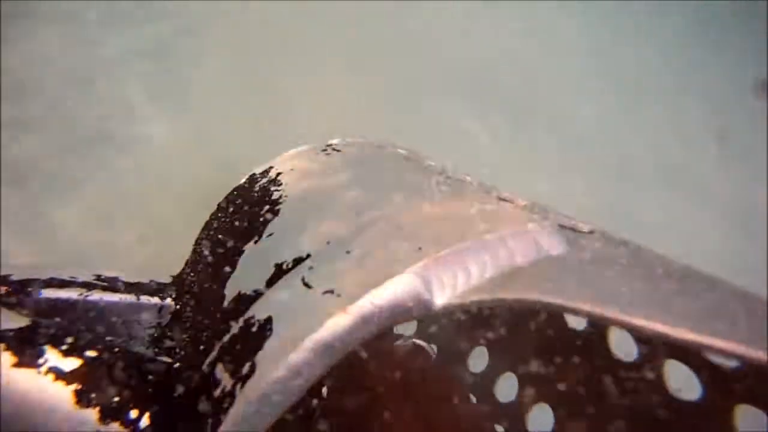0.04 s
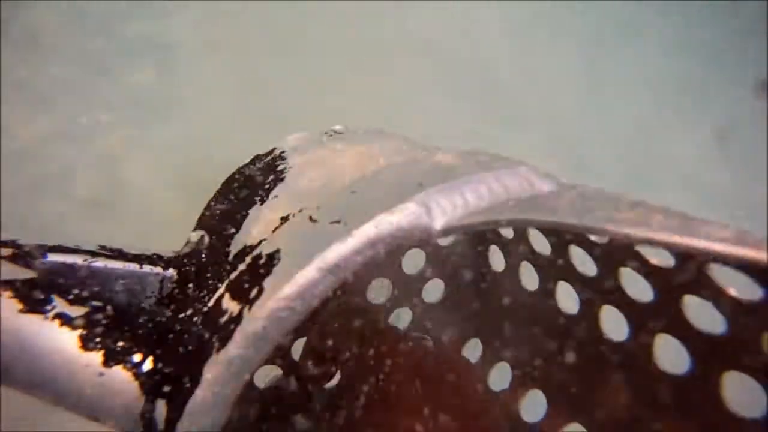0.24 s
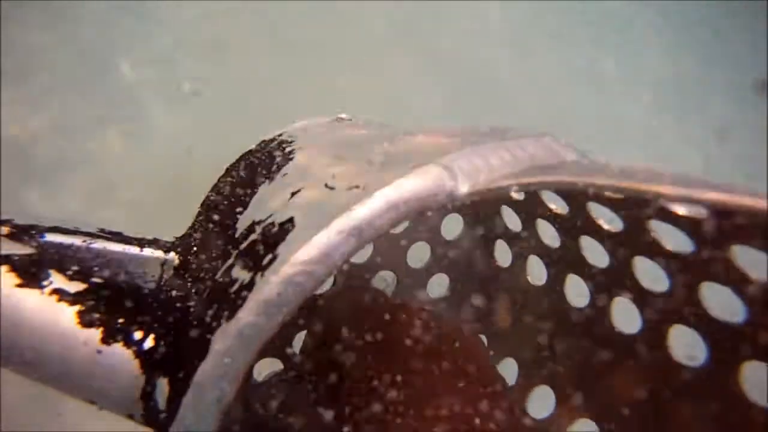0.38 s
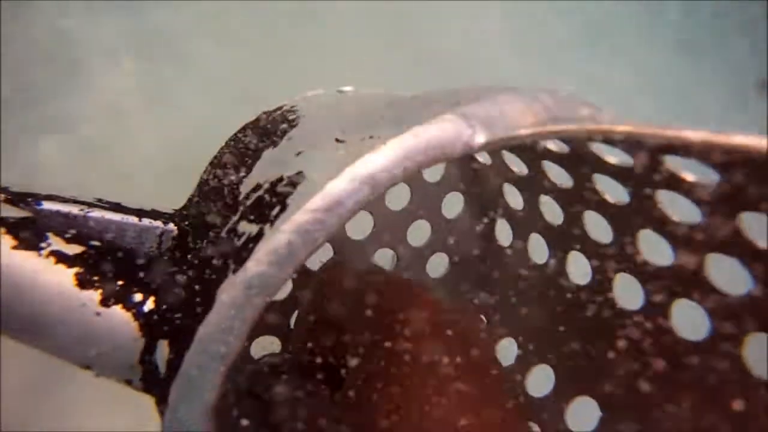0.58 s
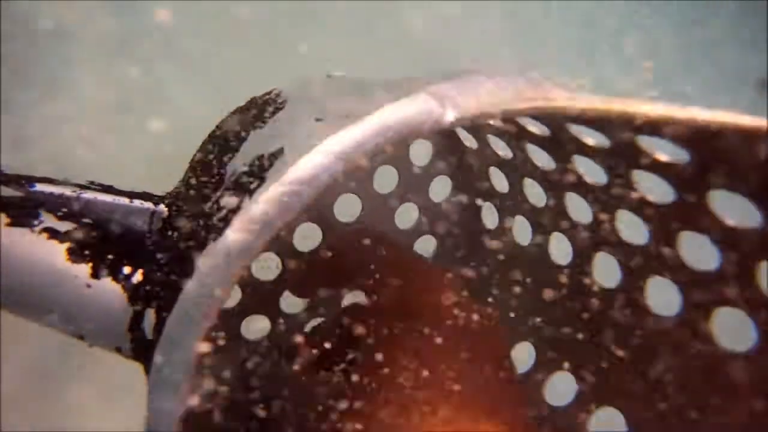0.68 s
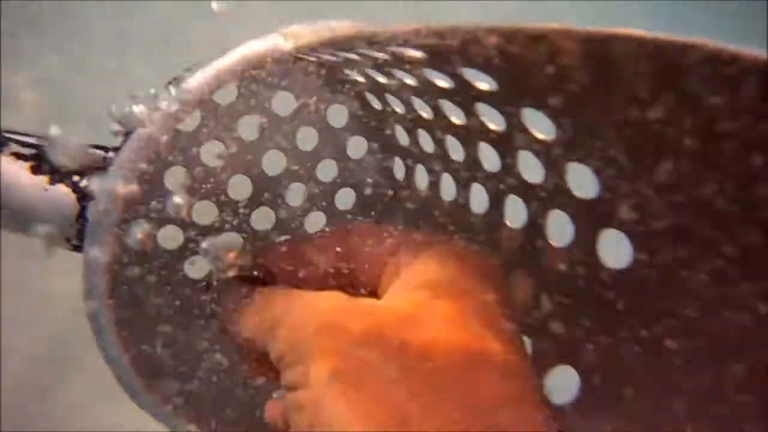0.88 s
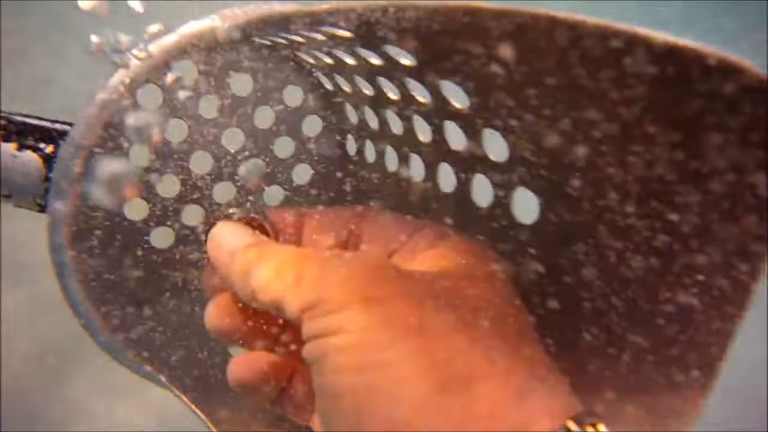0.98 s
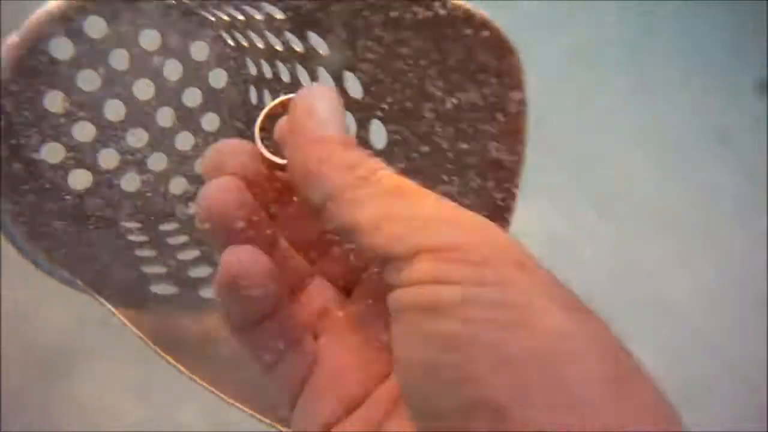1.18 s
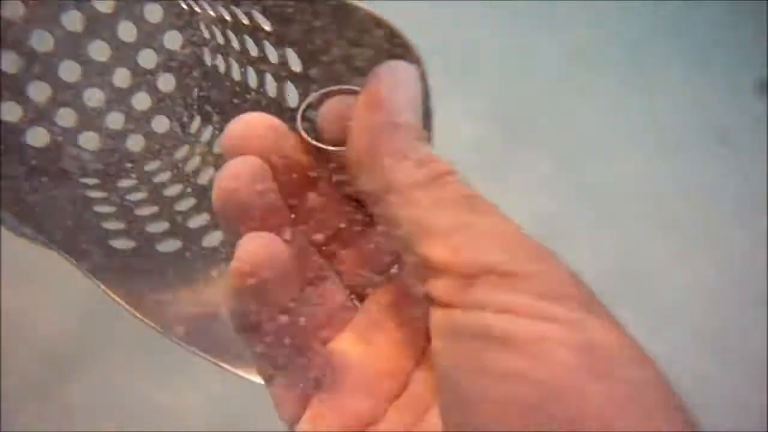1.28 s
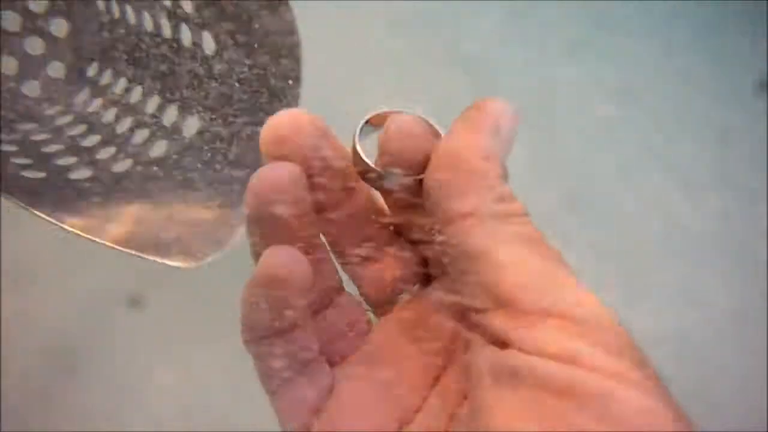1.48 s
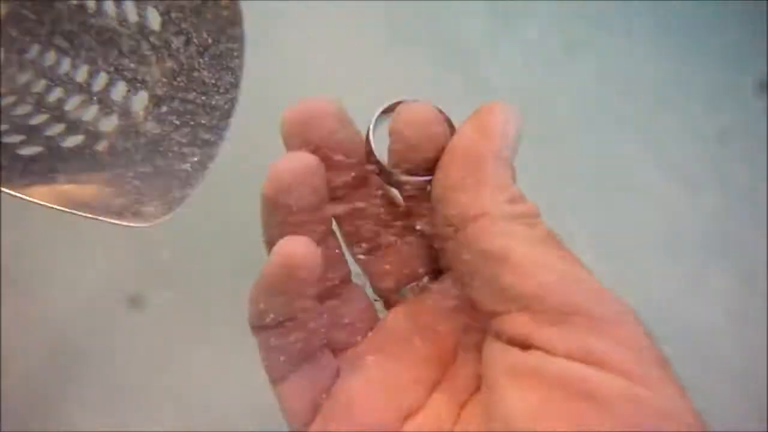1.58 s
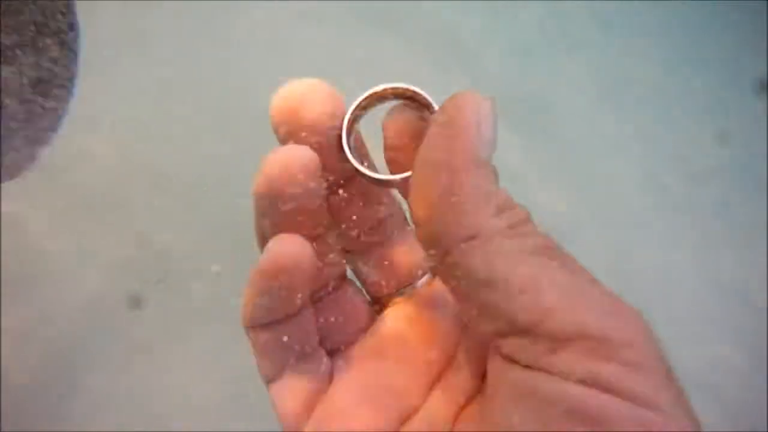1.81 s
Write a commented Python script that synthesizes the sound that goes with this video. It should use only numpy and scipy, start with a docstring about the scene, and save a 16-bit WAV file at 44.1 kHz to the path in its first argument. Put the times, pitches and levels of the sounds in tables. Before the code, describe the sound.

A metal scoop knocks, squeaks and scrapes as it is handled underwater.

```python
"""A perforated metal sand scoop is handled under water, close up, over a soft, steady rumble.
It knocks once hard, ringing its modes, then gives short stick-slip squeaks as it is rubbed.
A hand gropes inside, drags grit over the metal and slips off with a low ring; a few small bubbles trail off.
Throughout, the recorder samples slowly and holds each value, which mirrors the ring into the treble."""
import sys
import numpy as np
from scipy import signal
from scipy.fft import rfft, irfft
from scipy.io import wavfile

SR = 44100
rng = np.random.default_rng(int(sys.argv[2]) if len(sys.argv) > 2 else 0)


def to_wav(sig):
    """Store sig (one row per channel, or 1-D mono) as 16-bit WAV at the path in sys.argv[1].

    Samples outside -1..1 are clipped; the rate is SR.
    """
    pcm = np.clip(np.atleast_2d(sig), -1, 1) * 32767
    pcm = np.round(pcm).astype(np.int16)
    wavfile.write(sys.argv[1], SR, pcm.T)  # frames by channels


N = 81585
TIME = np.arange(N) / SR
FREQS = np.fft.rfftfreq(2 * N, 1 / SR) + 1e-3

# the scoop's modes: (frequency [Hz], relative level struck [dB], relative level rubbed [dB], t60 [s])
SCOOP_MODES = [(620.8, -28, -9, 0.28), (680, -40, -7, 0.025), (846.5, -24.5, -23, 0.1),
               (1095, -51, -14.5, 0.045), (1331, -23.5, -10.5, 0.17), (1429, -13.5, -14, 0.046),
               (1722.5, -20, -16.5, 0.068), (1738, -31, -13, .045), (2061, -5, -10, 0.082),
               (2263, -6, -3, 0.069), (2401, -8.5, -4, 0.046), (2643, -14, -17.5, 0.056),
               (2910, -12, -15.5, 0.041), (3057, -21, -9.5, 0.027), (3547, -16, -20.5, 0.051),
               (3717, -27, -20, 0.13), (4300, -28, -27, 0.064)]


def from_db(db):
    """Decibels to gain."""
    return 10 ** (np.asarray(db) / 20)


def rms(x):
    """Average signal level."""
    return np.sqrt(np.mean(x ** 2) + 1e-20)


def envelopes(rows):
    """One gain envelope for each dB column of a breakpoint table."""
    times, *columns = np.transpose(rows)
    return [from_db(np.interp(TIME, times, db)) for db in columns]


def filtered(x, response):
    """EQ with one gain per frequency."""
    return irfft(rfft(x, 2 * N) * response)[:N]


def coloured(x, curve):
    """Shape a sound with an EQ curve and normalise it to rms 1."""
    hz, db = np.transpose(curve)
    shaped = filtered(x, from_db(np.interp(np.log(FREQS), np.log(hz), db)))
    return shaped / rms(shaped)


def band(x, edges_hz):
    """Band-pass filter."""
    return signal.sosfilt(signal.butter(3, edges_hz, "band", fs=SR, output="sos"), x)


def puff(at_s, width_s, db, edges_hz):
    """A bell-shaped swell of band-passed noise."""
    noise = band(rng.standard_normal(N), edges_hz)
    return from_db(db) * np.exp(-.5 * ((TIME - at_s) / width_s) ** 2) * noise / rms(noise)


def ring(force, hz, t60):
    """A resonator: each click sets off a decaying sine of the same height."""
    decay = np.exp(-np.log(1000) / (t60 * SR))
    step = 2 * np.pi * hz / SR
    return signal.lfilter([0, np.sin(step)], [1, -2 * decay * np.cos(step), decay ** 2], force + 1e-18)


def clicks(rows):
    """One click for each (time [s], level [dB])."""
    force = np.zeros(N)
    for at_s, db in rows:
        force[int(at_s * SR)] += from_db(db)
    return force


def knocks():
    """Each knock rings all the scoop's modes, with a short noisy crack on the attack."""
    # hits on the scoop: (time [s], level [dB])
    hits = [(.2062, -24.5), (.2114, -10), (.2828, -32), (.4965, -44), (.7182, -41), (.7712, -32.5),
            (.8195, -33)]
    # tone of the crack: (frequency [Hz], relative level [dB])
    crack_eq = [(200, 12), (900, -63), (1600, -9), (2400, 8.5), (3200, -5), (4200, -17), (5500, -15)]
    crack_db, crack_t60_s = -9.5, 0.083
    force = clicks(hits)
    metal = sum((-1) ** k * from_db(db) * ring(force, hz, t60)
                for k, (hz, db, _, t60) in enumerate(SCOOP_MODES))
    decay = np.exp(-np.log(1000) / (crack_t60_s * SR))
    crack_envelope = signal.lfilter([1], [1, -decay], force + 1e-18)
    crack = from_db(crack_db) * crack_envelope * coloured(rng.standard_normal(N), crack_eq)
    return band(metal + crack, edges_hz=(560, 6100))


def squeaks():
    """Stick-slip friction drives one mode at a time: nearly pure tones with a little grit in them."""
    # squeaks, the last one the low ring as the hand slips off:
    # (start [s], length [s], level [dB], pitch [Hz], attack [s], release [s])
    slips = [(.0968, 0.0047, -27, 2314, 0.00098, 0.00078), (0.106, 0.0023, -29.5, 2410, 0.0013, 0.0018),
             (0.1873, .0120, -27.5, 2304, 0.0044, 0.001), (0.2099, 0.0056, -7.5, 2350, 0.0012, .0008),
             (0.282, 0.0056, -34, 2343, .0007, 0.0031), (.4250, 0.0076, -28, 2285, 0.0018, 0.0031),
             (0.496, 0.0039, -29.5, 2260, 0.0025, 0.0016), (.5120, 0.0047, -30.5, 2330, 0.0015, 0.0025),
             (0.5995, 0.023, -32.5, 2285, .008, 0.0008), (0.6231, 0.0076, -22, 2303, .005, 0.009),
             (0.6364, 0.023, -16.5, 2278, .004, 0.0066), (0.669, 0.023, -33, 2246, .003, 0.0046),
             (0.717, 0.0031, -31.5, 2250, .001, 0.0012), (1.116, 0.05, -38.5, 628.3, 0.011, 0.054)]
    waver_hz, roughness_db, grit_db = 21, -1.05, -17.5
    tones, pressure = np.zeros(N), np.zeros(N)
    for start, length, db, hz, attack, release in slips:
        age = np.maximum(TIME - start, 0)
        envelope = from_db(db) * np.minimum(age / attack, 1) * np.exp(-np.maximum(age - length, 0) / release)
        waver, flutter = (noise / rms(noise) for noise in band(rng.standard_normal((2, N)), (60, 300)))
        cycles = np.cumsum((hz + waver_hz * waver) * (age > 0)) / SR
        tones += envelope * from_db(roughness_db * flutter) * np.sin(2 * np.pi * cycles)
        pressure += envelope
    return tones + friction(from_db(grit_db) * pressure, edges_hz=(1700, 4140), crunch_db=3.5)


def friction(pressure, edges_hz, crunch_db):
    """Dense grains ring the hand-damped scoop and add their own crunch; the level rides the pressure."""
    # tone of the crunch: (frequency [Hz], relative level [dB])
    crunch_eq = [(200, -7.5), (500, -3), (900, -7), (1500, -4.5), (2400, 1.5), (3200, -6), (4200, -6.5),
                 (5500, -5)]
    grains_per_s, spread_db, damped_t60_s = 1800, 2.5, 0.083
    sizes = from_db(spread_db * np.minimum(rng.exponential(1, N), 4)) * rng.choice([-1, 1], N)
    grains = sizes * (rng.random(N) < grains_per_s / SR)
    force = np.array([grains, grains * pressure])   # the steady row only sets the gain
    metal = sum((-1) ** k * from_db(db) * ring(force, hz, min(t60, damped_t60_s))
                for k, (hz, _, db, t60) in enumerate(SCOOP_MODES))
    crunch = from_db(crunch_db) * coloured(grains, crunch_eq)
    steady, pressed = band(metal / rms(metal[0]) + [crunch, crunch * pressure], edges_hz)
    return pressed / rms(steady)


def scrape():
    """The hand drags grit over the metal and pushes water into the scoop; sand hisses past."""
    # envelopes of the dragged grit: (time [s], treble [dB], mids [dB], bass [dB])
    drag = [(.66, -100, -100, -100), (0.706, -42, -68, -65), (0.718, -37.5, -47, -40),
            (0.754, -37, -41.5, -54), (0.767, -45, -34, -35.5), (.79, -34, -43, -52.5),
            (0.812, -35.5, -40, -35), (.834, -34.5, -47, -54), (.85, -40.5, -49, -49), (.88, -42, -56, -55),
            (0.904, -44.5, -57, -40), (.924, -41.5, -51, -66), (0.939, -43.5, -44, -45),
            (0.964, -43.5, -45, -51.5), (1.021, -48, -80, -45.5), (1.064, -41.5, -55.5, -52),
            (1.105, -47, -55, -49), (1.146, -36.5, -42, -46), (1.168, -48.5, -76, -58),
            (1.195, -79, -72, -51), (1.25, -90, -90, -97)]
    # its treble, mid and bass bands: (low edge [Hz], high edge [Hz])
    drag_bands = [(1710, 5300), (970, 1760), (252, 785)]
    # puffs of sand over the metal: (time [s], width [s], level [dB])
    sand_puffs = [(0.09, 0.012, -48.5), (0.576, .012, -57), (.645, 0.014, -46), (1.145, 0.0062, -52)]
    grit = sum(friction(pressure, edges_hz, crunch_db=-5.5)
               for pressure, edges_hz in zip(envelopes(drag), drag_bands))
    push = puff(at_s=.772, width_s=0.018, db=-45.5, edges_hz=(280, 600))
    hiss = sum(puff(at_s, width_s, db, edges_hz=(2415, 4810)) for at_s, width_s, db in sand_puffs)
    return grit + push + hiss


def rubbing():
    """The scoop rings faintly under the grip that turns it."""
    # envelope of the light rubbing: (time [s], level [dB])
    grip = [(0, -42.5), (.02, -52.5), (.07, -54), (.09, -46), (.125, -54.5), (.17, -49.5), (.20, -36),
            (.235, -39), (.272, -41.5), (.292, -43.5), (.312, -55.5), (.41, -53), (.435, -35), (.47, -63),
            (.50, -45.5), (.54, -44), (.59, -50.5), (.645, -33), (.69, -54), (.75, -107)]
    return friction(envelopes(grip)[0], edges_hz=(660, 3550), crunch_db=-20)


def water():
    """A steady bed of low noise, dotted with the pings of small bubbles."""
    # tone of the rumble: (frequency [Hz], relative level [dB])
    rumble_eq = [(20, -9), (45, -5.5), (90, -0.5), (200, 0.5), (400, -3), (700, -5), (1000, -9),
                 (2000, -12.5), (3000, -16.5), (4500, -19), (5600, -24)]
    # small bubbles: (time [s], pitch [Hz], level [dB])
    pings = [(.722, 1750, -32.5), (.754, 1210, -32.5), (0.767, 1180, -33), (0.809, 1157, -30),
             (.860, 736, -37.5), (0.873, 890, -39), (.901, 1135, -38.5), (0.999, 1390, -44),
             (1.075, 1570, -41), (1.552, 1800, -47), (1.708, 1900, -50.5)]
    rumble = from_db(-51) * coloured(rng.standard_normal(N), rumble_eq)
    bubbles = sum(ring(clicks([(at_s, db)]), hz, t60=0.04) for at_s, hz, db in pings)
    return rumble + bubbles


def scene():
    """Scoop and water, mixed to mono."""
    return (knocks() + squeaks() + rubbing() + scrape() + water())[None]


def record(dry):
    """Peaks are soft-clipped; sample-and-hold mirrors the sound about its rate; the top is cut."""
    ceiling, input_edge_hz, hold_hz, cutoff_hz = .55, 5684, 12000, 15400
    clipped = ceiling * np.tanh(dry[0] / ceiling)
    narrow = filtered(clipped, 1 / np.sqrt(1 + (FREQS / input_edge_hz) ** 50))
    mirrored = narrow * (1 + 2 * np.cos(2 * np.pi * hold_hz * TIME))
    hold_droop = np.sinc(FREQS / hold_hz)
    high_cut = 1 / np.sqrt(1 + (FREQS / cutoff_hz) ** 200)
    return filtered(mirrored, hold_droop * high_cut)[None]


dry = scene()
out = record(dry)
to_wav(out)
```